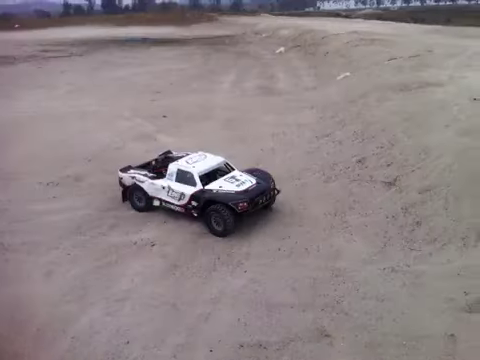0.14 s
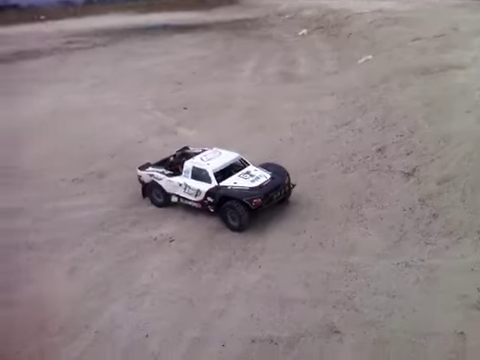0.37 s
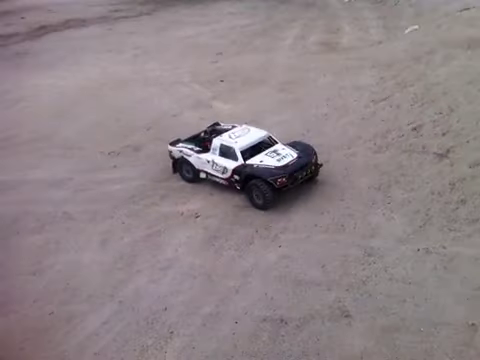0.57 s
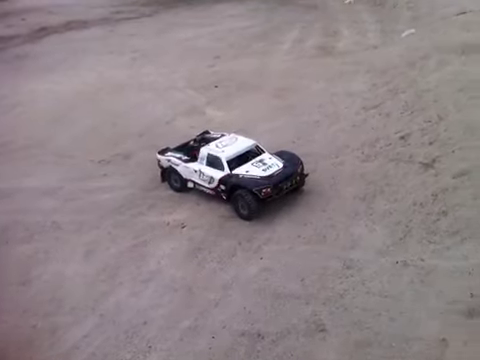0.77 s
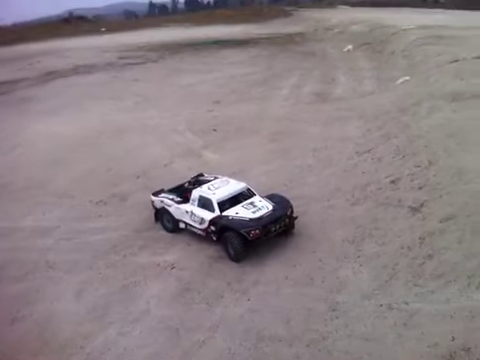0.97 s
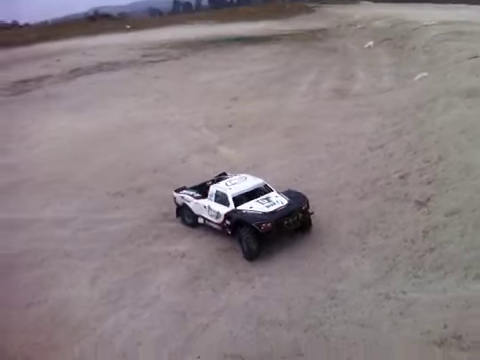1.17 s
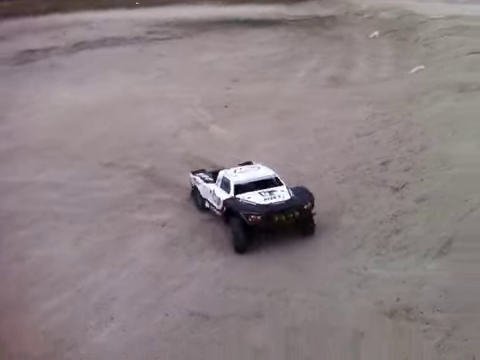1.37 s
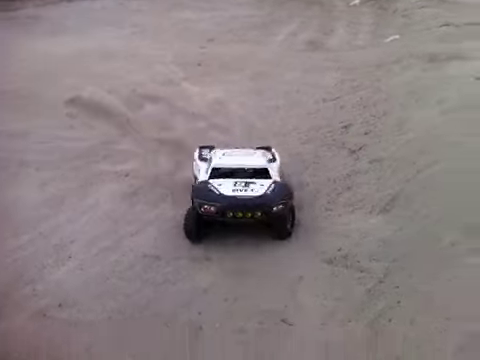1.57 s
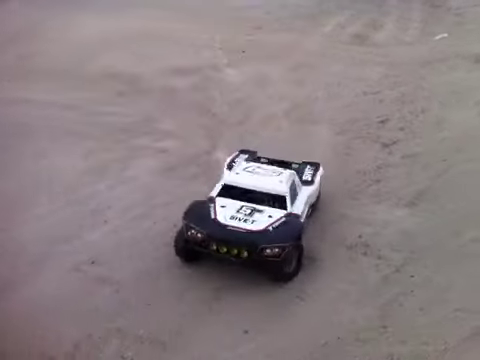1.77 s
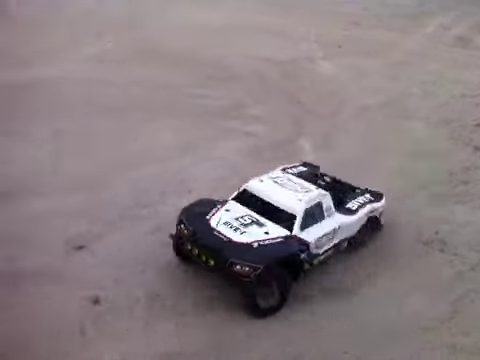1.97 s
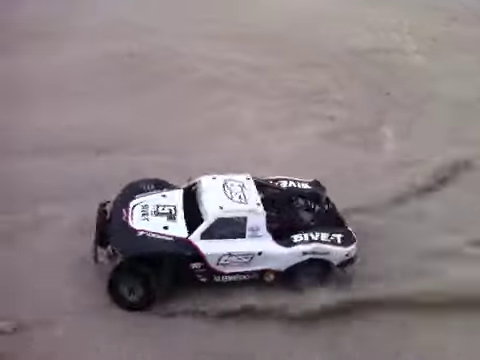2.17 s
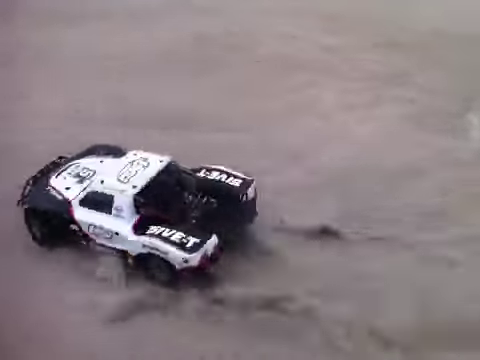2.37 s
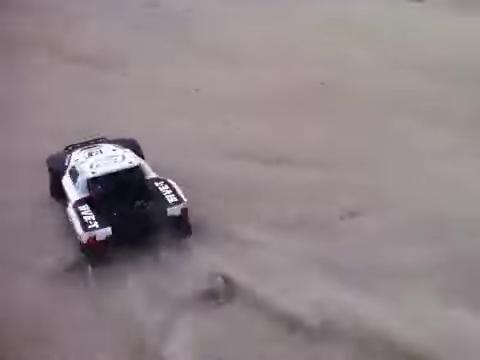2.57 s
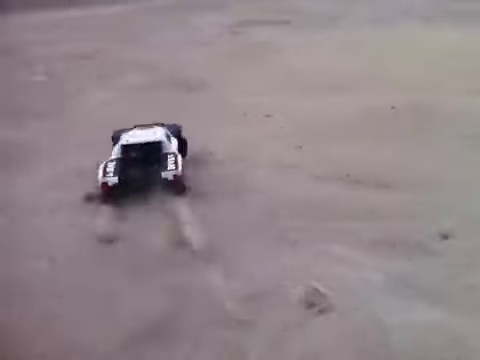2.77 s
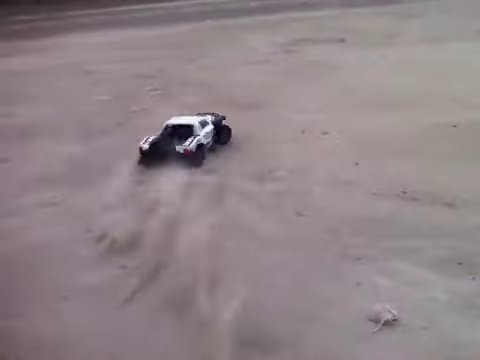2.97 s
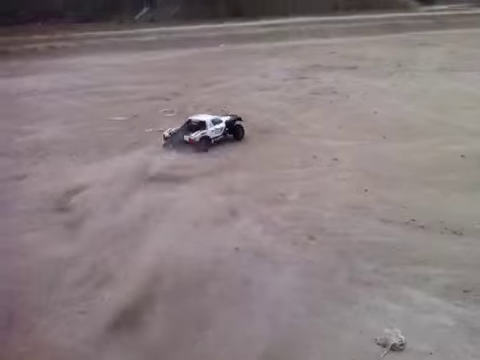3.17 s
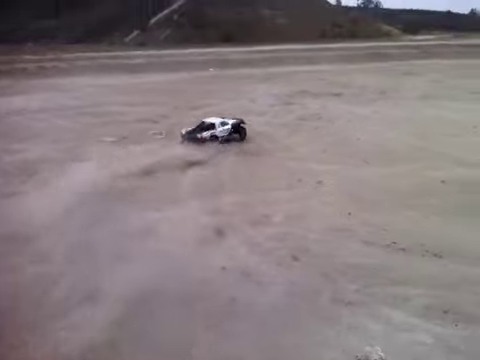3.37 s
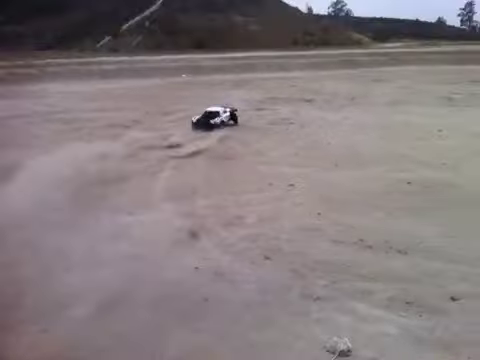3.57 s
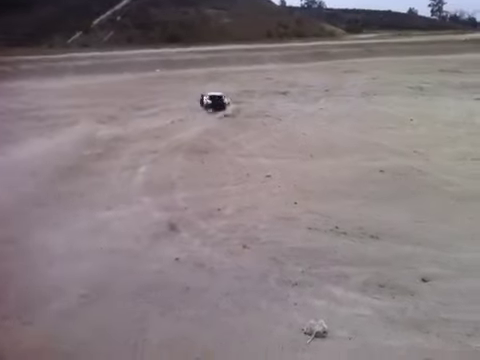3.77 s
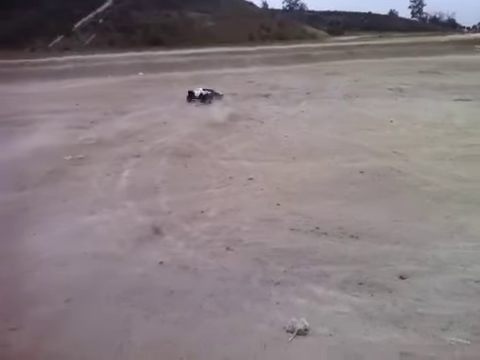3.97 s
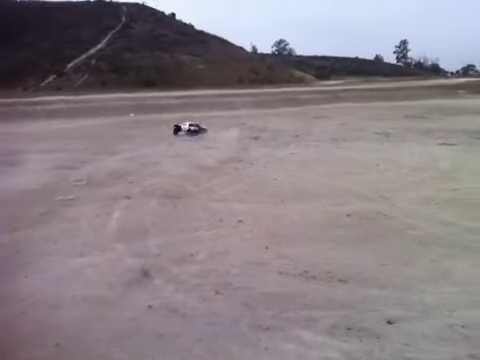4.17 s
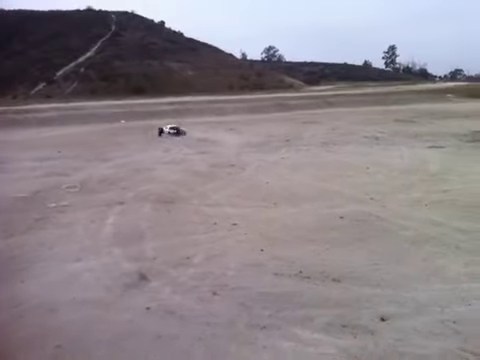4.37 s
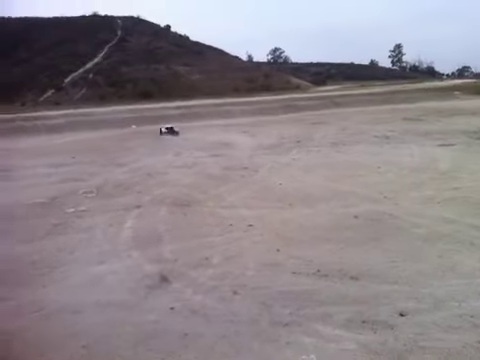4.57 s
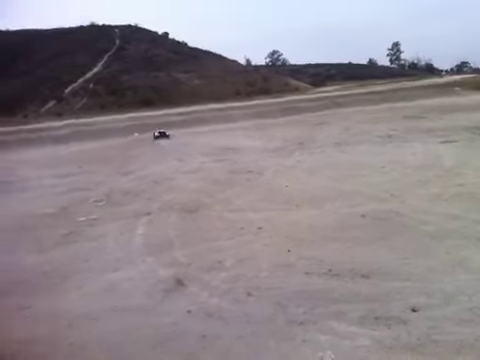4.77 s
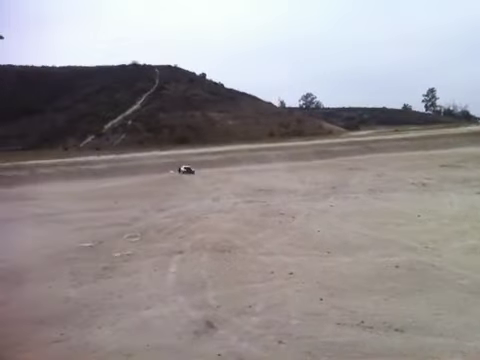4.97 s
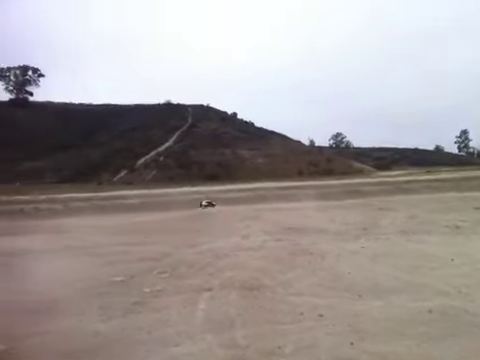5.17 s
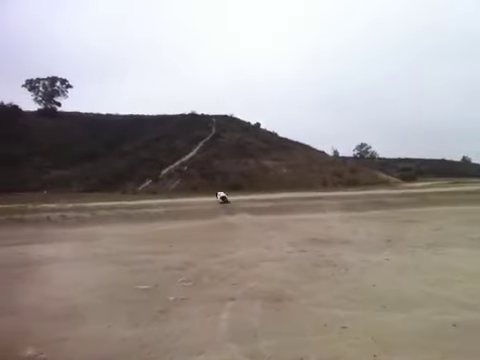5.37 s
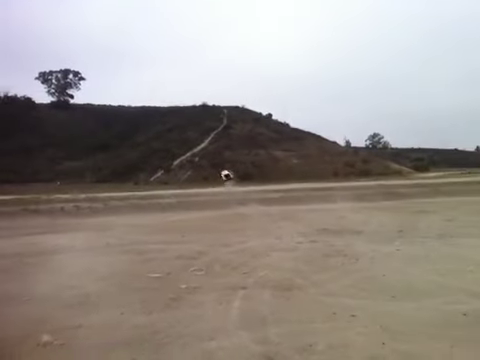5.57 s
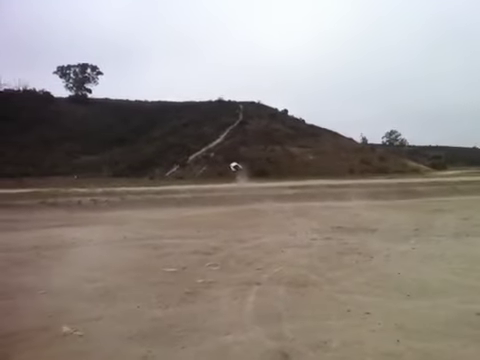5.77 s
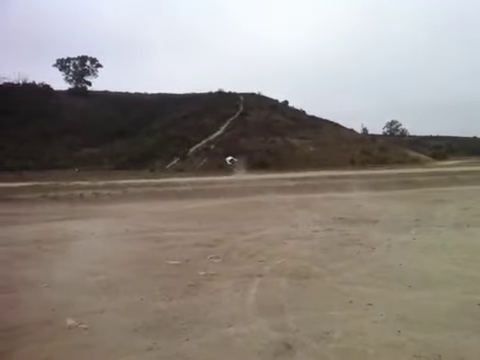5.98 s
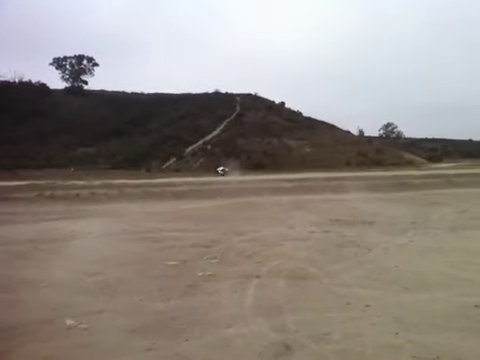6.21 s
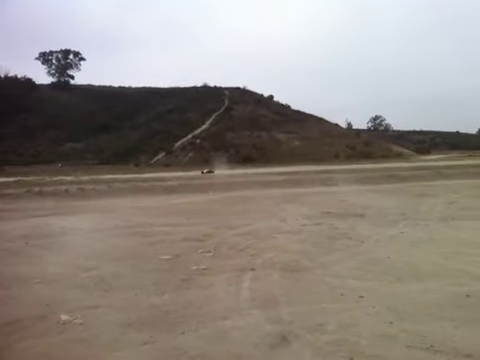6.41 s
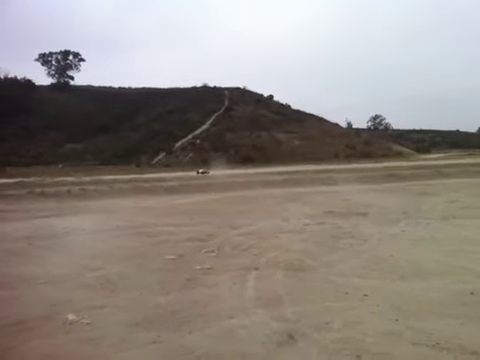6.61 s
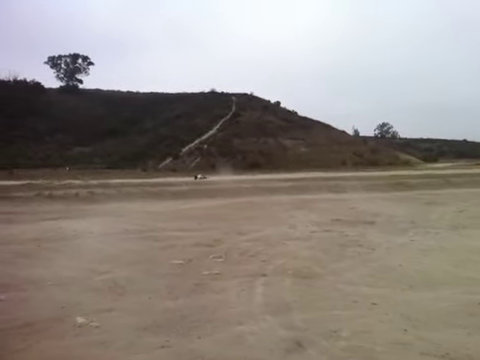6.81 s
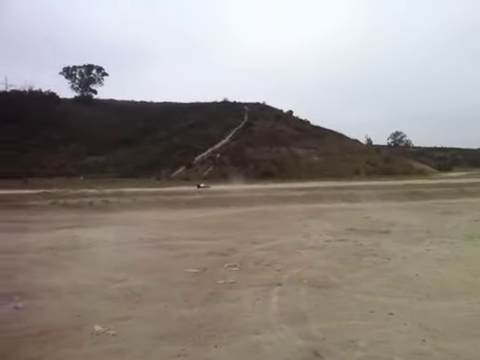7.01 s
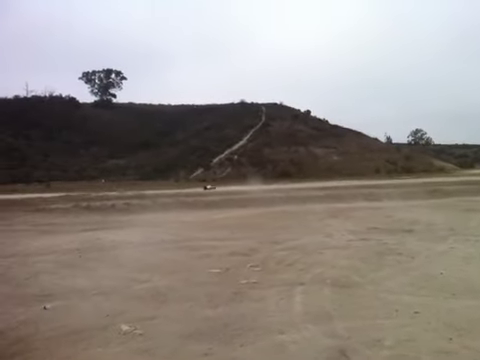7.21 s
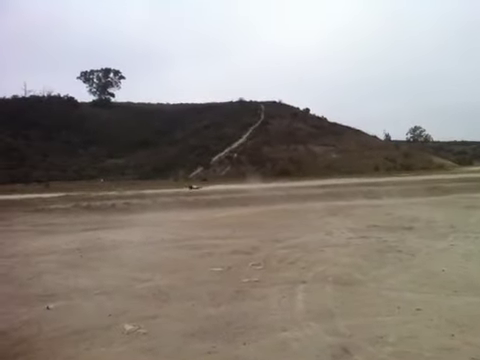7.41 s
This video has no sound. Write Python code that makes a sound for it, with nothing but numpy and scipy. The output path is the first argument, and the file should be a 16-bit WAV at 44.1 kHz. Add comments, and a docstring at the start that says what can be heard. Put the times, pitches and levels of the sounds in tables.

```python
"""Model truck on open dirt

A small two-stroke idles with lone firings a few turns apart, is blipped again and again, spins round and drives away.
The engine is a pulse train locked to the crank angle, mixed with gated noise and passed through resonances.
Lone firings are cracks with a rattling tail, digging wheels are short noise scuffs, and the air is coloured noise.
Both channels carry the same sound."""
import sys
import numpy as np
from scipy import signal
from scipy.fft import rfft, irfft, next_fast_len
from scipy.io import wavfile
from scipy.ndimage import uniform_filter1d, map_coordinates

SR = 44100
rng = np.random.default_rng(int(sys.argv[2]) if len(sys.argv) > 2 else 0)


def generate_wav(sig):
    """Save sig (samples, or channels by samples) to the path in sys.argv[1] as 16-bit PCM at SR."""
    pcm = np.round(np.clip(np.atleast_2d(sig).T, -1, 1) * 32767).astype(np.int16)
    wavfile.write(sys.argv[1], SR, pcm)


N = 328545  # length [samples]

# Lone firings, at idle and later while the engine slows or picks up:
# (time [s], relative level before gain and filters [dB])
LONE_FIRINGS = [(0.0333, -8), (0.0817, -13), (0.1196, -14), (0.1575, -13), (0.195, -14), (0.2329, -13),
                (0.2708, -16), (0.3082, -10), (0.3451, -8), (0.382, -7), (0.4184, -10), (0.4549, -7),
                (0.4913, -16), (0.5157, -14), (0.5407, -10), (0.5766, -7), (0.6125, -11), (0.7063, -12),
                (0.7417, -16), (0.7657, -13), (0.814, -15), (0.8505, -9), (0.8994, -14), (0.9368, -7),
                (0.9857, -9), (1.034, -8), (4.695, -18), (6.351, -34), (6.4915, -29), (6.5263, -29),
                (6.5515, -33)]
# Throttle blips: (opens [s], shuts [s], first firing relative to full level [dB], rise [s], rasp [dB],
# swell by the end, before each layer's share [dB], bark [dB], pipe [dB], intake [dB], hum [dB],
# base roughness [factor]; then coasting: pipe [dB], fade before each layer's share [dB/s],
# base roughness [factor]); the layer levels precede the lug and heading changes
BLIPS = [(1.044, 1.501, -5, 0.031, -17.5, -6.5, -20.5, -20.5, -42, -33.5, 0.28, -30, 6.8, 2.4),
         (1.94, 2.22, -5.5, 0.019, -20, 21, -26, -21.5, -38, -32, 0.74, -26.5, 19, 2.3),
         (2.389, 2.611, -7.5, 0.047, -18.5, -30, -30, -19.5, -41, -32.5, 1, -27.5, 17, 6.6),
         (2.751, 3.781, -5, 0.034, -20, -10, -31.5, -22.5, -42, -29.5, 1, -28.5, 5.1, 2.15),
         (4.0962, 4.675, -2, 0.081, -19.5, -17, -32, -26, -42, -29.5, 1, -31, 11.8, 2.1),
         (5.006, 5.546, -9, 0.27, -23, -15, -32.5, -23, -46.5, -31, 1, -30, 5.5, 2.1),
         (6.55, 7.446, -14, 0.13, -32, -45, -43, -21.5, -37.5, -32, 1, -10, 4.9, 1.1)]
CATCH_S = .001  # from throttle opening to the first level of a blip


def amp(db):
    """Level to amplitude ratio: 20 dB is a factor of ten."""
    return 10 ** (np.asarray(db) / 20)


def unit(x, size=8192):
    """Power normalization: x at a running rms of 1 over size samples."""
    return x / np.sqrt(np.abs(uniform_filter1d(x ** 2, size)) + 1e-20)


def filtered(x, response):
    """Linear filtering: the spectrum of x times a complex response of frequency."""
    m = next_fast_len(N + 8192)
    return irfft(rfft(x, m) * response(np.fft.rfftfreq(m, 1 / SR)), m)[:N]


def modes(table, sign=-1):
    """Modal superposition: causal resonances add; like signs leave deep notches between them."""
    def response(f):
        total = 0
        for k, (centre, width, db) in enumerate(table):
            resonance = 1j * f * width / (centre * centre - f * f + 1j * f * width)
            total = total + sign ** k * amp(db) * resonance
        return total
    return response


def colour(points):
    """Minimum phase: folding the cepstrum gives a causal response through (Hz, dB) points on a log axis."""
    def response(f):
        hz, db = np.transpose(points)
        level = np.interp(np.log(f + 1), np.log(hz + 1), np.maximum(db, -70))
        cepstrum = irfft(np.log(amp(level)))
        half = len(cepstrum) // 2
        cepstrum[1:half] *= 2
        cepstrum[half + 1:] = 0
        return np.exp(rfft(cepstrum))[:len(f)]
    return response


def wobble(rate):
    """Band-limited fluctuation: a smooth curve through random knots, rate of them a second."""
    knots = rng.standard_normal(int(N * rate / SR) + 4)
    return map_coordinates(knots, [np.arange(N) * rate / SR])


def patchy(x, patchy_db):
    """Time-varying spectrum: smoothed random gains make parts of the spectrum swell and sink slowly."""
    z = signal.stft(x, nperseg=1024)[2]
    gain = rng.standard_normal(z.shape)
    for _ in range(2):
        gain = uniform_filter1d(gain, size=3, axis=0)
        gain = uniform_filter1d(gain, size=4, axis=1)
    return signal.istft(z * amp(patchy_db * gain / gain.std()), nperseg=1024)[1][:N]


def along(rows):
    """Linear interpolation in time: one value per sample for each column after the time."""
    s, *columns = np.transpose(rows)
    return [np.interp(np.arange(N) / SR, s, c) for c in columns]


def field():
    """Broadband background: noise shaped by a fixed spectrum stands for faint air over open ground."""
    # Open-air spectrum: (frequency [Hz], relative spectral level [dB])
    air_spectrum = [(15, -8), (40, -35), (120, 2), (326, 3), (516, -64), (695, 2), (1480, -12), (1840, 1),
                    (13600, -18.5), (16000, -100)]
    air = patchy(filtered(rng.standard_normal(N), colour(air_spectrum)), patchy_db=1.5)
    return amp(-49) * unit(air, size=N)


def thuds():
    """Impact excitation: short decaying noise through two damped resonances, as wheels dig into dirt."""
    # Wheels digging in: (time [s], level before decay and filtering [dB])
    scuffs = [(1.941, -23), (2.037, -17.5), (2.14, -22.5), (2.214, -19), (2.387, -25), (2.445, -21),
              (2.476, -17), (2.749, -34), (2.94, -20)]
    blows, t = np.zeros(N + SR), np.arange(SR // 10) / SR
    for s, db in scuffs:
        envelope = amp(db - 60 * t / 0.07) * np.minimum(t / .003, 1)
        blows[round(s * SR):][:len(t)] += envelope * rng.standard_normal(len(t))
    dull = modes([(220, 200, 18), (800, 700, 11)])
    return filtered(blows[:N], lambda f: dull(f) * 1j * f / (1j * f + 90))


def pops():
    """Impulse response: a lone firing cracks sharply, then the muffler rattles out without bass."""
    # Colour of a lone firing: (frequency [Hz], relative spectral level [dB])
    crack_colour = [(88, -15), (200, 4.5), (330, -2), (422, 1), (580, -10), (720, -1), (900, 2.5),
                    (1300, -17.5), (1550, -5), (1950, -11), (2760, -9.5), (4080, -15.5), (4670, -25.5),
                    (5460, -23), (9080, -34), (10800, -30.5), (16000, -49)]
    # Change of colour far off, behind the truck: (frequency [Hz], change of level [dB])
    far_colour = [(300, -10), (1500, 2), (3000, -4), (6500, 14.5), (16000, 7)]
    crack_lag_s, gain_db = .0013, 27.0
    near, far = blows = np.zeros((2, N + SR))
    t = np.arange(SR // 20) / SR
    for s, db in LONE_FIRINGS:
        rattle = signal.lfilter([1, -2, 1], [1, -1.6, .64], rng.standard_normal(len(t)))
        burst = .18 * amp(-60 * t / .045) * rattle
        burst[0] = 1  # the crack itself
        is_far = int(s > BLIPS[0][0])
        blows[is_far, round((s + crack_lag_s) * SR):][:len(t)] += amp(db + gain_db) * burst
    return filtered(near[:N] + filtered(far[:N], colour(far_colour)), colour(crack_colour))


def crank(speed):
    """Phase is integrated speed; whole turns lie between idle firings and the first firings of the blips."""
    turns = np.cumsum(speed) / SR
    firings = [s for s, db in LONE_FIRINGS if s < BLIPS[0][0]]
    firings += [row[0] + 2 * CATCH_S for row in BLIPS[1:]]
    at = np.round(np.array(firings) * SR).astype(int)
    whole = np.cumsum(np.round(np.diff(turns[at], prepend=turns[at[0]])))
    return turns + np.interp(np.arange(N), at, whole - turns[at])


def pulses(turns, jitter, scatter_db):
    """Band-limited pulse train: a windowed sinc each turn, a little uneven in time and size."""
    whole = np.arange(np.ceil(turns[0]), turns[-1])
    chance = rng.standard_normal((len(whole), 2))
    at = np.interp(whole + jitter * chance[:, 0], turns, np.arange(N))
    taps = np.floor(at)[:, None] + np.arange(-7, 9)
    offset = taps - at[:, None]
    kernel = np.sinc(offset) * np.cos(np.pi * offset / 16) ** 2
    size = amp(scatter_db * chance[:, 1:])
    places = np.clip(taps, 0, N - 1).astype(int)
    return np.bincount(places.ravel(), (kernel * size).ravel(), N)


def shell(x, t60, share, size=8192):
    """Dense reflections: the body shell answers each pulse with a short rattle, redrawn in regular blocks."""
    t, out = np.arange(SR // 50) / SR, np.zeros(N + 2 * size)
    x, fade = np.pad(x, (size // 2, size)), np.hanning(size)
    for start in range(0, N + size // 2, size // 2):  # crossfaded blocks, each with a new random tail
        tail = amp(-60 * t / t60) * rng.standard_normal(len(t))
        tail *= np.sqrt(share) / np.linalg.norm(tail)
        tail[0] = np.sqrt(1 - share)  # direct pulse
        part = signal.fftconvolve(x[start:start + size] * fade[:len(x) - start], tail)
        out[start:start + len(part)] += part[:len(out) - start]
    return out[size // 2:][:N]


def after_firing():
    """Transient envelope: about 1 at each idle firing, with a Gaussian decay after it."""
    decay_s = .012
    t = np.arange(N) / SR
    fired = np.array([-1] + [s for s, db in LONE_FIRINGS if s < BLIPS[0][0]])
    since = t - fired[np.searchsorted(fired, t) - 1]
    return uniform_filter1d(np.exp(-(since / decay_s) ** 2), size=64)


def throttle(speed):
    """Load-dependent source strength: layer levels, pipe tone and roughness idle, then follow every blip."""
    # Six tables with one value per layer (rasp, bark, pipe, intake, hum)
    # Idle base level: (rasp [dB], bark [dB], pipe [dB], intake [dB], hum [dB])
    idle_db = [-46, -41.5, -30, -24.5, -30]
    # Share of a blip's swell, same layers: [ratio]
    swell_share = np.array([0.23, 0.051, 0.24, 0.055, 0.051])
    # Level over the coasting pipe setting once the throttle is shut, same layers: [dB]
    coast_offset_db = np.array([-5.5, -4.5, -2.5, -18, -9.5])
    # Share of the coasting fade, same layers: [ratio]
    fade_share = np.array([5.1, 5.04, 0.89, 1.3, 0.52])
    # Change with speed, throttle open, same layers: [dB per octave]
    lug_slopes = [0, -3, -7.5, 5, -5.5]
    # Change just after an idle firing: intake drops most, rasp, bark and pipe dip, hum rises slightly;
    # same layers: [dB]
    after_changes = [-6, -4, -1, -12, 2]
    upper_idle, upper_open, upper_coast = .12, .99, .99  # power share of the pipe's upper tones
    idle_rough = 3.2  # factor on the noise share
    spinup_rough = .35  # added per 500 turns a second gained each second
    shut_s = 0.015  # throttle closing
    lug_speed = 185  # turns a second at which the lug change is zero

    rest = [*idle_db, upper_idle, idle_rough, 0]
    rows = [(0, *rest), (BLIPS[0][0], *rest)]
    ends = [row[0] for row in BLIPS[1:]] + [N / SR + 1]
    for blip, end in zip(BLIPS, ends):
        opens, shuts, catch_db, rise, rasp_db, swell_db, *others, rough, coast_db, fade_db, coast_rough = blip
        full, shut = np.array([rasp_db, *others]), coast_db + coast_offset_db
        swollen = full + swell_db * swell_share
        faded = shut - fade_db * fade_share * (end - shuts)
        rows += [(opens + CATCH_S, *(full + catch_db), upper_open, rough, 1),
                 (opens + CATCH_S + rise, *full, upper_open, rough, 1),
                 (shuts, *swollen, upper_open, rough, 1),
                 (shuts + shut_s, *shut, upper_coast, coast_rough, 0),
                 (end, *faded, upper_coast, coast_rough, 0)]
    *levels, upper, rough, opened = along(rows)
    octaves = np.log2(speed / lug_speed)
    gaining = np.clip(uniform_filter1d(np.gradient(speed) * SR, size=2048), 0, None)
    levels = [db + lug_db * opened * octaves for db, lug_db in zip(levels, lug_slopes)]
    after = after_firing()
    levels = [db + after_db * after for db, after_db in zip(levels, after_changes)]
    return *levels, upper, np.abs(rough + spinup_rough * gaining / 500)


def rings(beat):
    """Selective resonance: firing pulses through one narrow band, faded in and out, fluttering a little."""
    # Bands that stand out as the truck turns: (from [s], to [s], frequency [Hz], rms level before flutter [dB])
    bands = [(0, 0.608, 967, -37), (1.027, 1.16, 1160, -25), (1.18, 1.5, 3820, -35),
             (1.183, 1.504, 5100, -29), (1.197, 1.49, 1180, -25), (1.628, 1.95, 953, -36),
             (1.942, 2.04, 973, -16.5), (1.953, 2.004, 3120, -23), (1.928, 2.004, 1950, -26.5),
             (2.443, 2.626, 3430, -33), (5.46, 5.553, 3400, -29), (2.05, 2.225, 5130, -31.5),
             (2.446, 2.598, 5000, -45), (2.06, 2.221, 1310, -26.5), (2.07, 2.22, 2420, -31),
             (2.41, 2.497, 1740, -31), (2.778, 3.032, 1030, -32), (3.06, 3.393, 2740, -27),
             (3.11, 3.247, 1500, -47), (3.237, 3.437, 1046, -32.5), (3.244, 3.743, 506, -36.5),
             (3.285, 3.466, 3300, -21.5), (3.511, 3.583, 3120, -24.5), (3.563, 3.63, 1030, -24),
             (3.552, 3.647, 2790, -29), (3.652, 3.77, 2330, -25.5), (3.732, 3.787, 3130, -20),
             (4.095, 4.26, 1230, -34.5), (4.5, 4.697, 1010, -37), (4.59, 4.688, 2130, -32),
             (4.494, 4.69, 1610, -34), (5.254, 5.507, 584, -33.5), (5.596, 5.7, 1610, -33.5),
             (5.604, 6.146, 1117, -39.5), (5.795, 5.903, 1550, -43.5), (5.97, 6.13, 1540, -40.5),
             (5.56, 6.35, 3030, -58.5), (6.578, 6.742, 1050, -44), (6.724, 7.184, 1470, -37),
             (6.933, 7.118, 2330, -44), (7.272, 7.366, 2340, -33.5), (7.02, 7.132, 3230, -47)]
    relative_width, fade_s = .17, 0.024  # width over pitch at 1 kHz; length of the fades
    t, out = np.arange(N) / SR, np.zeros(N)
    for start, end, hz, db in bands:
        gate = np.clip(np.minimum(t - start, end - t) / fade_s + .5, 0, 1)
        resonance = modes([(hz, relative_width * np.sqrt(1000 * hz), 0)])
        tone = gate * filtered(beat, lambda f: resonance(f) ** 2)
        to_unit = np.sqrt(np.sum(gate ** 2) / np.sum(tone ** 2))
        out += amp(db + 2.2 * wobble(30)) * tone * to_unit
    return out


def engine():
    """Source and filter: each turn drives a pulse and turbulent puffs through intake, pipe and muffler."""
    # Crankshaft speed before its random wobble: (time [s], speed [turns/s])
    crank_speed = [(0, 83), (1.0, 83), (1.04, 87), (1.15, 166), (1.2, 182), (1.24, 186.4), (1.39, 185.3),
                   (1.49, 206), (1.56, 173), (1.62, 151.6), (1.93, 110.4), (2.01, 173), (2.05, 184),
                   (2.22, 189.8), (2.32, 150), (2.38, 141), (2.45, 179), (2.6, 186), (2.7, 151.5),
                   (2.75, 144), (2.8, 176), (2.9, 184.4), (2.97, 212.4), (3.118, 242), (3.146, 239.6),
                   (3.168, 245.4), (3.188, 238), (3.212, 246.7), (3.236, 242.6), (3.274, 257),
                   (3.294, 248.8), (3.464, 249), (3.482, 239.5), (3.514, 248), (3.528, 243.4), (3.59, 257),
                   (3.622, 254), (3.65, 241), (3.68, 244.4), (3.696, 238), (3.78, 253), (3.86, 238),
                   (3.98, 168.7), (4.08, 149), (4.19, 186.5), (4.278, 207.5), (4.344, 238), (4.4, 260),
                   (4.474, 250), (4.506, 239), (4.524, 243), (4.554, 236.7), (4.582, 248), (4.612, 238),
                   (4.64, 247), (4.672, 241), (4.9, 163.5), (5.0, 150.6), (5.06, 179), (5.096, 182),
                   (5.162, 197), (5.26, 245), (5.296, 256), (5.322, 252), (5.36, 262.6), (5.39, 243.4),
                   (5.422, 232.7), (5.46, 201.6), (5.48, 195.5), (5.56, 214.3), (5.654, 204.5), (5.73, 190),
                   (5.846, 174.7), (6.216, 135.8), (6.51, 114), (6.55, 119), (6.62, 169), (6.68, 183),
                   (6.75, 233), (6.83, 258), (6.886, 250), (6.932, 232.4), (7.064, 254), (7.102, 248.7),
                   (7.134, 256), (7.184, 257.7), (7.222, 245.6), (7.25, 255.5), (7.278, 238.3),
                   (7.304, 248.5), (7.328, 241.6), (7.362, 258.4), (7.382, 255.3), (7.45, 267.6)]
    # Five sets of resonances: (frequency [Hz], width [Hz], relative level [dB])
    intake_modes = [(408, 36, 0), (480, 55, -10), (200, 80, -15), (300, 40, -15)]
    bark_modes = [(2570, 240, 8.5), (3222, 51, 12.5), (3213, 510, 4.5), (4050, 55, 8), (4800, 1060, -5)]
    low_modes = [(820, 120, .1), (965, 60, -2)]
    high_modes = [(520, 110, 13), (1030, 115, 17), (1230, 100, 7), (1570, 120, 14.5), (2300, 300, 11)]
    front_modes = [(259, 44, 11.6), (576, 81, 7), (839, 120, 6), (997, 377, 3.9), (1378, 45, 4.9)]  # pipe heard from ahead of the truck
    # Rasp spectrum: (frequency [Hz], relative level [dB])
    rasp_colour = [(700, -12), (1900, 3), (2940, -6.5), (5000, -3.5), (5720, -1.5), (6290, -1), (7580, -4),
                   (8230, -3.5), (9870, -6), (14100, -8), (15700, -11)]
    # As the truck turns: (time [s], power share heard from ahead [0-1], pipe swell [dB], bark swell [dB])
    heading = [(0, 0.55, 2.5, 6), (.6, 0.18, 3.5, 6.5), (.64, 0.23, 5.5, 12), (.72, 0.05, 4, 9.5),
               (1.02, 0.8, 0, 3), (1.1, 0.79, -0.5, -5.5), (1.9, 0.44, 5.5, 8), (2.1, 0.77, -8.5, -4.5),
               (2.5, 0.36, -0.5, 4.5), (2.85, 0.48, 2.5, 4.5), (3.22, 0.45, 0, 4.5), (3.33, 0.72, 2.5, 6.5),
               (3.7, 0.24, 3, 7), (4.4, 0.33, 3.5, 1.3), (4.95, 0.11, 5, 9.5), (5.35, 0.04, 4.5, 1.5),
               (5.5, 0.46, 2, 5), (5.62, 0.1, -3, -0.5), (6.05, 0.05, -12, 6), (6.17, 0.38, -5.5, 6),
               (6.7, 0.04, -5, 6), (7.45, 0, 4.5, 12.5)]
    rasp_follows = 0.63  # share of the bark's swell that the rasp takes too

    speed = along(crank_speed)[0]
    rasp_db, bark_db, pipe_db, intake_db, hum_db, upper, rough = throttle(speed)
    turns = crank(speed * (1 + .007 * (speed / 250) ** 2 * wobble(45)))
    beat = unit(pulses(turns, jitter=.0015, scatter_db=.7))
    rattle = shell(beat, t60=.014, share=.4)

    def above(f, edge_hz):
        """Radiation from small openings is weak in the bass: a third-order high-pass."""
        return (1j * f / (1j * f + edge_hz)) ** 3

    def voice(blows, response, share, blow, patchy_db, lag=0, hiss_hz=1):
        """Flow noise: pulses join noise that dies over blow turns after exhaust and, half a turn on, intake."""
        exhaust = np.exp(-(turns % 1) / blow)
        inlet = .5 * np.exp(-((turns + .5) % 1) / blow)
        noise = (exhaust + inlet + .5) * rng.standard_normal(N)

        def path(f):
            """A delay of lag seconds is a linear phase on the filter."""
            return response(f) * above(f, edge_hz=58) * np.exp(-2j * np.pi * f * lag)

        puff = unit(filtered(noise, lambda f: path(f) * above(f, hiss_hz)))
        noise_share = np.clip(share * rough, 0, 1)
        pulsed = np.sqrt(1 - noise_share) * unit(filtered(blows, path))
        return unit(patchy(pulsed + np.sqrt(noise_share) * puff, patchy_db))

    def steep(table, hz, width, sign=-1):
        """Cascaded resonance: a wide one over the set, so that little leaks out beside it."""
        return lambda f: modes(table, sign)(f) * modes([(hz, width, 0)])(f)

    # a sine at the turning rate
    hum = np.sqrt(2) * amp(hum_db + 1.2 * wobble(41)) * np.sin(2 * np.pi * turns)
    hum = amp(6) * filtered(hum, lambda f: above(f, edge_hz=150))
    intake = voice(beat, steep(intake_modes, 400, 400, sign=1), share=.03, blow=.4, patchy_db=.6, lag=.006)
    low = voice(beat, steep(low_modes, 880, 500), share=.04, blow=.4, patchy_db=1, lag=.007)
    high = voice(beat, steep(high_modes, 1300, 1100, sign=1), share=.06, blow=.4, patchy_db=3)
    bark = voice(rattle, steep(bark_modes, 3500, 3000), share=.11, blow=.3, patchy_db=3)
    rasp = voice(rattle, colour(rasp_colour), share=.33, blow=.3, patchy_db=4, hiss_hz=1600)
    front = voice(beat, steep(front_modes, 900, 1200), share=.06, blow=.4, patchy_db=2.5)

    ahead, pipe_swell_db, bark_swell_db = along(heading)
    upper, ahead = np.clip(upper, 0, 1), np.clip(ahead, 0, 1)
    behind = np.sqrt(1 - upper) * low + np.sqrt(upper) * high
    pipe = np.sqrt(1 - ahead) * behind + np.sqrt(ahead) * front
    exhaust = amp(pipe_db + pipe_swell_db) * pipe
    exhaust += amp(bark_db + bark_swell_db) * bark
    exhaust += amp(rasp_db + rasp_follows * bark_swell_db) * rasp
    return hum + rings(beat) + amp(intake_db) * intake + exhaust


def scene():
    """Superposition: the sources add at one point, the engine through a 70 Hz third-order high-pass."""
    truck = filtered(engine(), lambda f: (1j * f / (1j * f + 70)) ** 3)
    mono = field() + thuds() + pops() + truck
    return np.array([mono, mono])


def record(dry):
    """Saturation and band limiting: the input rounds tall spikes, drops deep bass and cuts the top."""
    top_hz = 15900
    soft = dry[0] / (1 + np.abs(dry[0] / .75) ** 4) ** (1 / 4)
    limited = filtered(soft, lambda f: (f < top_hz) * 1j * f / (1j * f + 40))
    return np.array([limited] * 2)


dry = scene()
out = record(dry)
generate_wav(out)
```